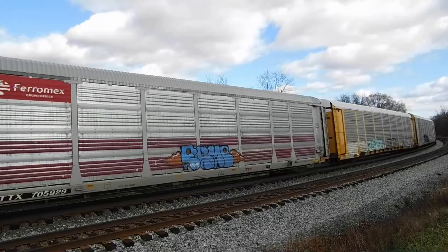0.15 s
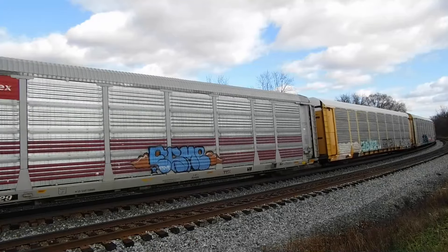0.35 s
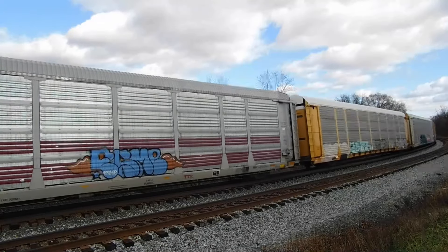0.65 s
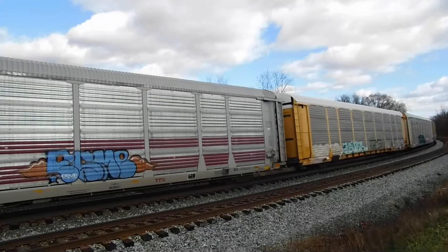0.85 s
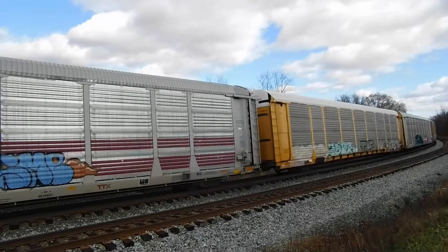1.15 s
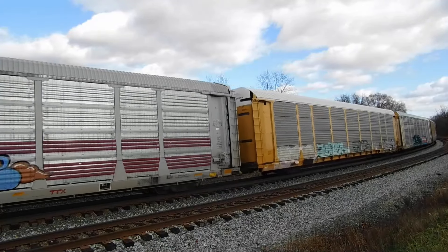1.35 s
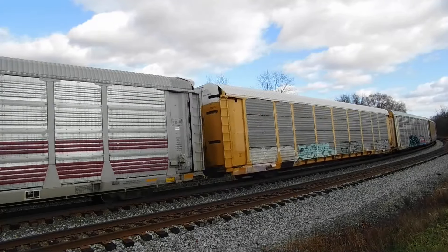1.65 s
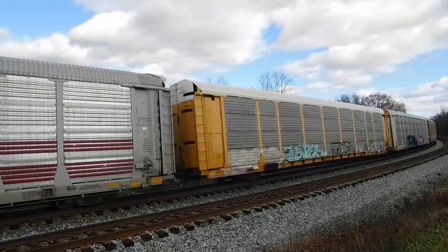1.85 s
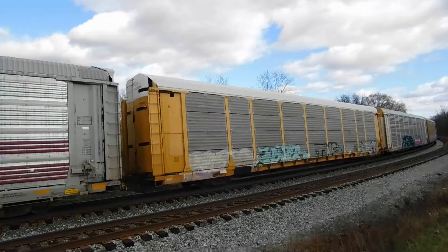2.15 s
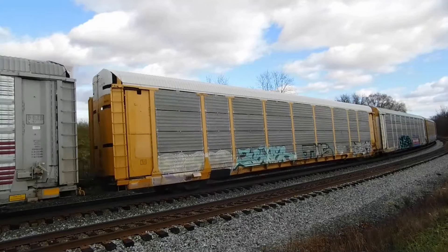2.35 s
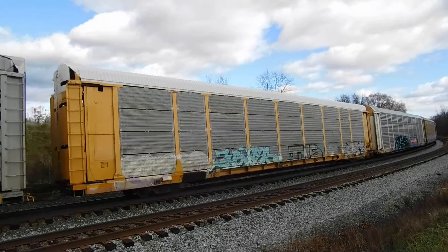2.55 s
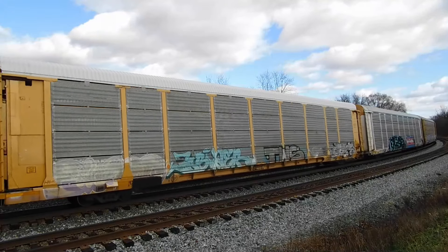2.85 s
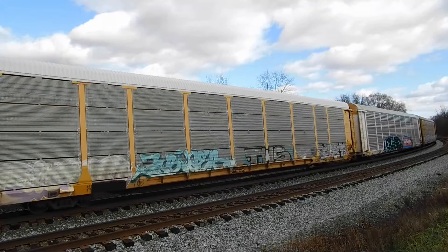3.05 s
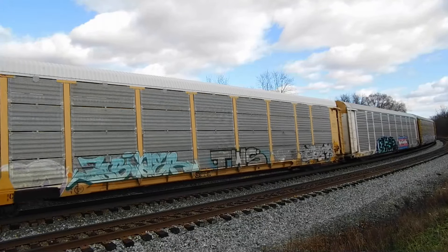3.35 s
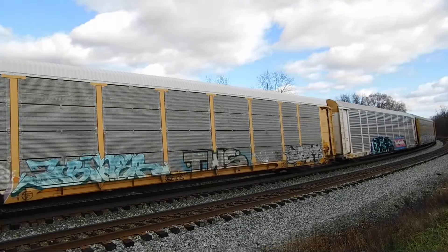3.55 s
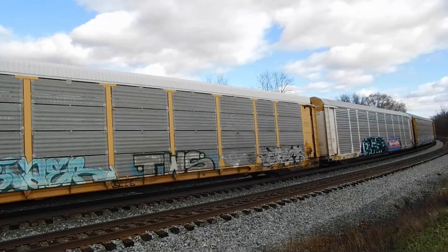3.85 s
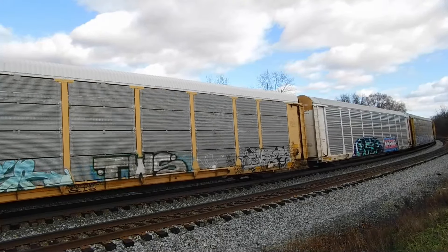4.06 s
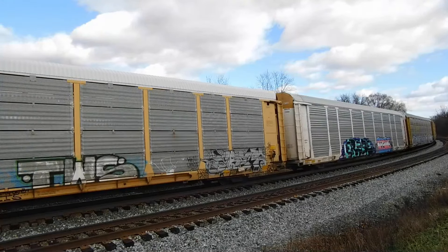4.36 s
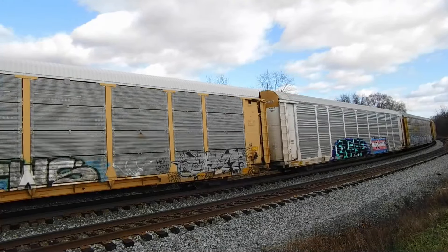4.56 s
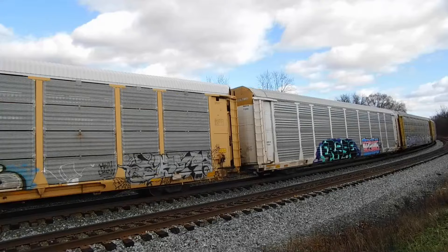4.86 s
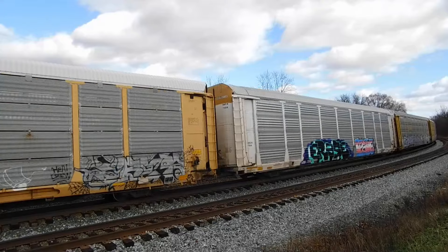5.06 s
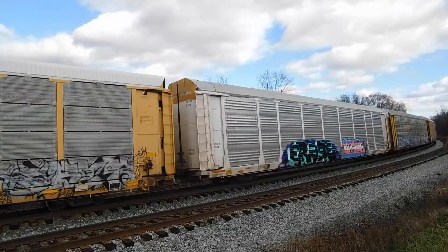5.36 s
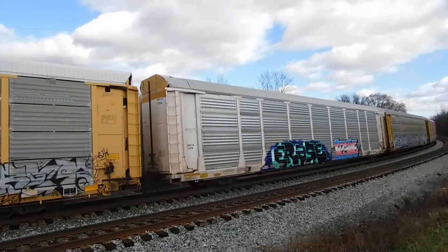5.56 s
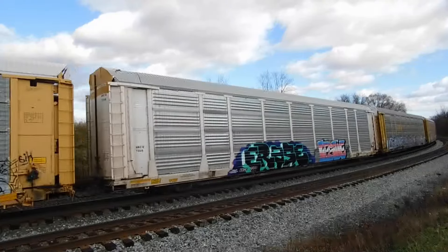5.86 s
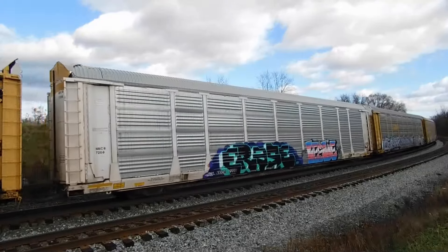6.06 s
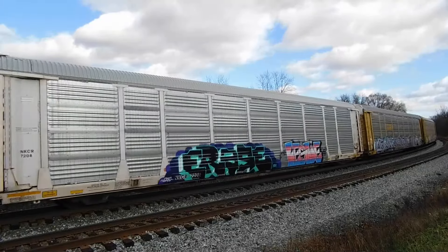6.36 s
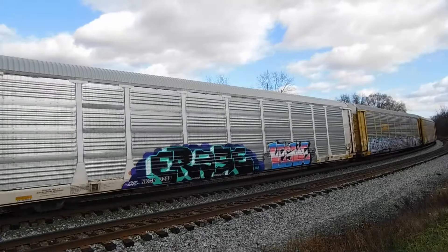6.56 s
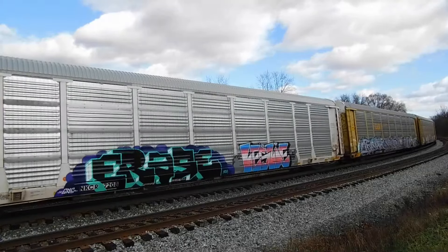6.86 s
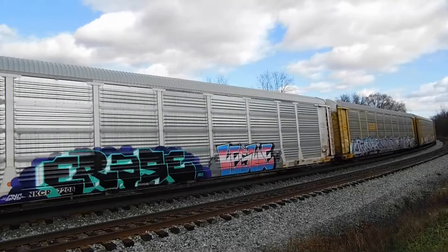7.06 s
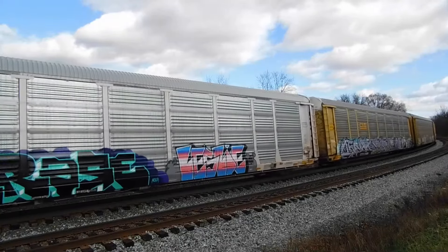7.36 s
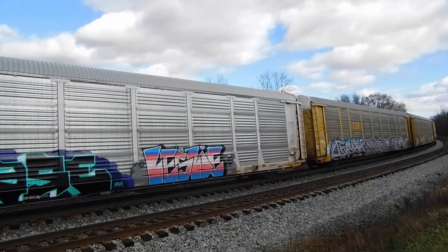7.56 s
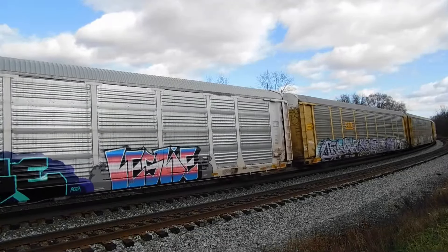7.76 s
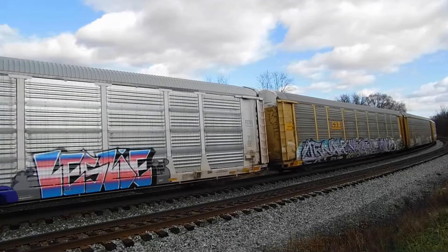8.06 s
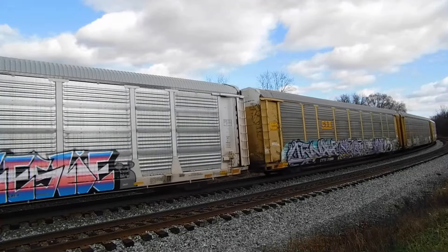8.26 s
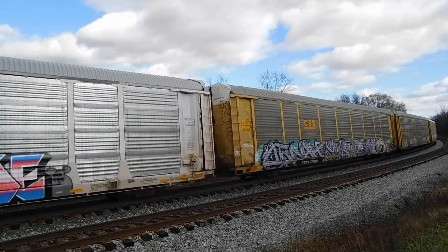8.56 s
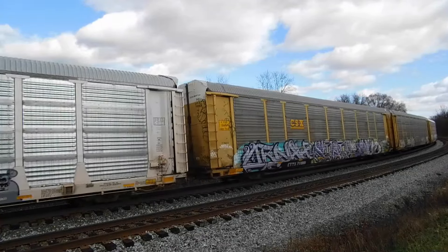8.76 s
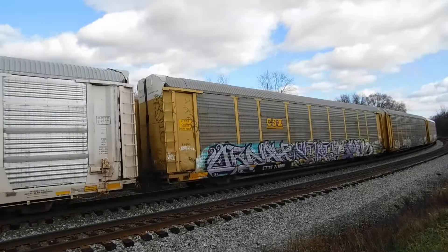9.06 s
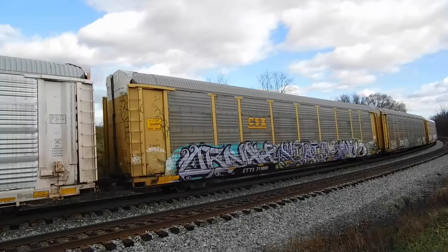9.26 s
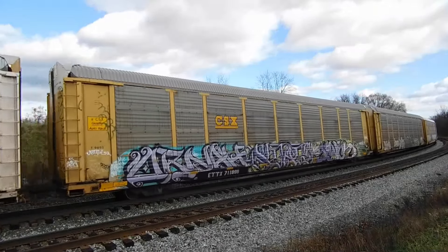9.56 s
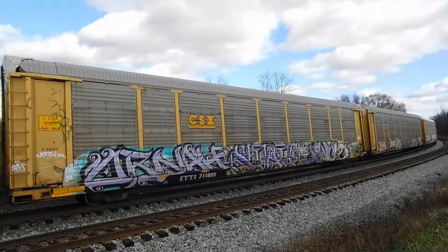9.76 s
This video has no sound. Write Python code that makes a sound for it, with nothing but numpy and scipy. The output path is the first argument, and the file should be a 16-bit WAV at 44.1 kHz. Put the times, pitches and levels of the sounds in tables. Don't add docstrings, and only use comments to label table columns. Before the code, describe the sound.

A freight train rolls close by outdoors, one wheel screaming a piercing, overloaded metallic squeal that drops slightly in pitch and fades as it recedes.

```python
import sys
import numpy as np
from scipy import signal
from scipy.io import wavfile
from scipy.ndimage import uniform_filter1d

SR = 44100
rng = np.random.default_rng(int(sys.argv[2]) if len(sys.argv) > 2 else 0)


def undo_db(level):
    steps = np.asarray(level, float) / 20
    return 10 ** steps


def log_audio(samples):
    frames = np.atleast_2d(samples).T
    limited = np.clip(frames, -1, 1)
    pcm = np.round(limited * 32767).astype(np.int16)
    wavfile.write(sys.argv[1], SR, pcm)


N = 437022


def rms_one(x):
    return x / np.sqrt(np.mean(x ** 2) + 1e-20)


def in_time(rows):
    s, *columns = np.transpose(rows)
    return [np.interp(np.arange(N) / SR, s, c) for c in columns]


def at_hz(points, hz):
    table_hz, values = np.transpose(points)
    return np.interp(np.log(hz), np.log(table_hz), values)


def drift(rate_hz):
    r = np.exp(-80 * np.pi * rate_hz / SR)
    sparse = rng.standard_normal(N // 40 + 2002)
    slow = signal.lfilter([1], [1, -2 * r, r * r], sparse)[2000:]
    return np.interp(np.arange(N) / 40, np.arange(len(slow)), rms_one(slow))


def bandpass(x, order, low_hz, high_hz):
    return signal.sosfilt(signal.butter(order, [low_hz, high_hz], "band", fs=SR, output="sos"), x)


def resonance(x, hz, width_hz):
    r = np.exp(-np.pi * width_hz / SR)
    poles = [1, -2 * r * np.cos(2 * np.pi * hz / SR), r * r]
    return signal.lfilter([(1 - r * r) / 2, 0, (r * r - 1) / 2], poles, x)


def pair(mid, side, alike):
    alike = np.clip(alike, -1, 1)
    return (np.sqrt(1 + alike) * mid + np.sqrt(1 - alike) * side * [[1], [-1]]) / np.sqrt(2)


def late_right(x, lag_us):
    i = np.arange(N)
    return np.array([x[0], np.interp(i - lag_us * SR / 10 ** 6, i, x[1])])


def spells(rows, rest_db, edge_s):
    gain = np.full((2, N), undo_db(rest_db))
    for s, length_s, db, *right_db in rows:
        start, stop = int(max(s, 0) * SR), int((s + length_s) * SR)
        gain[:, start:stop] = undo_db(db + np.array([[0], [sum(right_db)]]))
    return uniform_filter1d(gain, size=int(edge_s * SR), axis=1, mode="nearest")


# (start [s], length [s], level [dB])
LOW_LUMPS = [(.04, 0.092, -38), (.58, 0.1, -36), (.9, 0.13, -37.5), (1.4, 0.3, -37.5), (1.92, 0.12, -34),
             (2.15, 0.2, -33.5), (2.62, .22, -41), (3.04, 0.15, -31.5), (3.24, 0.27, -28), (3.62, .22, -32),
             (4.45, 0.17, -36), (5.4, 0.47, -47)]


def low_lumps():
    mid, side = [drift(7.1) + .5 * drift(46) + 0.42 * drift(235) for _ in range(2)]
    gain = spells(LOW_LUMPS, rest_db=-65, edge_s=.08)
    flutter_db = 9.5 + 2.5 * np.array([drift(1.2), drift(15)])
    return gain * undo_db(flutter_db) * pair(mid, side, 0.093)


# (time [s], level [dB])
ROLL = [(0, -29.5), (.7, -29.5), (1.35, -31.5), (2.2, -30), (2.95, -27.5), (4.0, -28), (5.4, -29.5),
        (6.0, -31), (6.9, -28.5), (8.2, -28), (8.6, -24.5), (9.3, -26), (9.91, -23.5)]
# (frequency [Hz], density [dB per Hz])
ROLL_COLOUR = [(24, -10), (70, -3.5), (189, -7.5), (500, 4), (1500, 1), (3000, -6), (8980, -26.5),
               (16000, -34)]
# (frequency [Hz], likeness [-1..1])
ROLL_ALIKE = [(60, 1), (300, 1), (1000, 0.9), (3000, 0.75), (9000, 0.033)]


def rolling():
    roll_db, = in_time(ROLL)
    together = drift(5)
    edges_hz = 24 * 2 ** np.arange(0, 9.6, .5)
    white = rng.standard_normal((2, 2, N))
    out = 0
    for k, (low_hz, high_hz) in enumerate(zip(edges_hz, edges_hz[1:])):
        mid, side = bandpass(white[k % 2], 2, low_hz, high_hz)
        hz = np.sqrt(low_hz * high_hz)
        gain = undo_db(at_hz(ROLL_COLOUR, hz) + .7 * together + .9 * drift(11))
        out = out + gain * pair(mid, side, at_hz(ROLL_ALIKE, hz))
    return undo_db(roll_db + 3) * late_right(rms_one(out), 113.3)


# (time [s], peak level [dB], t60 [s])
CLANKS = [
    (5.396, -26.5, 0.66),
    (5.435, -18, 0.24),
    (8.867, -25, 0.034),
    (9.391, -23, 0.3),
]
# (frequency [Hz], width [Hz], level [dB])
CLANK_MODES = [(680, 160, 0), (1250, 300, -3), (1580, 150, -3), (3600, 1500, -14)]


def couplers():
    burst, t = np.zeros(N), np.arange(N) / SR
    for s, peak_db, t60_s in CLANKS:
        age_s = np.clip(t - s, 0, None)
        burst += undo_db(peak_db + 2.5 - 60 * age_s / t60_s) * (1 - np.exp(-age_s / 0.0033))
    burst *= rng.standard_normal(N)
    clank = 0
    for hz, width_hz, db in CLANK_MODES:
        clank = clank + undo_db(db) * np.sqrt(3000 / width_hz) * resonance(burst, hz, width_hz)
    return late_right([clank, clank], 107)


SPEED_M_S, DISTANCE_M, NEAREST_S = 8.07, 11.4, 3.25


def doppler(nearest_s=NEAREST_S):
    along_m = SPEED_M_S * (np.arange(N) / SR - nearest_s)
    return 1 - SPEED_M_S / 343 * along_m / np.hypot(along_m, DISTANCE_M)


def wheel_mode(hz, width_hz, gain, lead_us):
    shift = np.where(np.arange(N) < 6.3 * SR, doppler(), doppler(11.5))
    phase = 2 * np.pi * np.cumsum(hz * shift) / SR
    ring = drift(width_hz) * np.sin(phase) + drift(width_hz) * np.cos(phase)
    return gain * late_right([ring, ring], lead_us)


QUIET_DB, SPELL_EDGE_S = -55, 0.15
# (start [s], length [s], level [dB])
HUMS = [(.2, 0.38, -32.5), (1.5, 0.68, -35), (2.6, 0.31, -34), (3.58, 0.23, -23.5), (3.85, 0.15, -21),
        (4.25, 0.38, -30), (4.6, 0.4, -29.5), (5.46, 0.25, -29.5), (6.5, 1.0, -32.5), (8.8, 0.21, -32),
        (9.0, .95, -35)]


def hum(lead_us):
    return undo_db(-4) * wheel_mode(600, 12, spells(HUMS, QUIET_DB, SPELL_EDGE_S), lead_us)


# (start [s], length [s], level [dB])
WHINES = [(0, .34, -45.5), (.36, 0.16, -35), (.63, 0.061, -31.5), (.85, .25, -47), (1.36, 0.18, -42),
          (2.62, .22, -48), (3.7, .14, -45), (4.12, 0.062, -31), (4.32, 0.12, -36.5), (4.5, 0.37, -43),
          (5.0, 0.21, -41), (5.42, 0.26, -42.5), (6.5, 1.0, -51), (9.42, 0.28, -40.5)]


def whine(lead_us):
    return undo_db(10) * wheel_mode(1452, 12, spells(WHINES, QUIET_DB, SPELL_EDGE_S), lead_us)


# (time [s], level [dB], right minus left [dB])
ECHOES = [(0, -14.5, 7), (.5, -10.5, 2), (1.2, -7.5, -2.5), (1.6, -8.5, -6.5), (2.2, -5, -5),
          (2.75, -5.5, -10.5), (3.2, -1.5, -5), (3.9, -7, -10), (4.5, -7.5, -7), (5.3, -12.5, -15),
          (6.0, -12, -9), (6.6, -13.5, -8.5), (6.79, -17, -6), (7.4, -20.5, -5), (8.0, -22, -6),
          (9.0, -25, -17.5), (9.55, -24.5, -2), (9.91, -45, -6)]
# (low [Hz], high [Hz])
ECHO_BANDS = [(2430, 2544), (2325, 2650)]
ECHO_DB = [5.5, -25.5]


def car_echoes(echo_db, right_db, lead_us):
    echoes = 0
    for (low_hz, high_hz), level_db in zip(ECHO_BANDS, ECHO_DB):
        mid, side = bandpass(rng.standard_normal((2, N)), 3, low_hz, high_hz)
        echoes = echoes + undo_db(level_db) * rms_one(pair(mid, side, 0.87))
    gain = undo_db(echo_db + 0.38 * right_db * [[-1], [1]])
    return gain * late_right(rms_one(echoes), 1.073 * lead_us)


# (start [s], length [s], left tone level [dB], right minus left [dB])
BITES = [(0, 0.21, -9, -0.5), (.3, 0.28, -18.5, 6), (.52, 0.47, -2.5, 3), (1.0, 0.54, 3, 4.5),
         (1.6, 0.15, -7, 1), (1.8, 0.068, -5.5, -6), (2.0, .32, 3, -3.5), (2.33, 0.27, 15.5, 0.5),
         (2.795, 0.32, 1.5, 1), (3.122, 0.19, 2, -0.5), (3.378, 0.19, -0.5, -4), (3.64, 0.098, -4, -8),
         (3.78, 0.437, 1.5, -3.5), (4.23, 0.22, -4, -16), (4.46, 0.14, -1, -1), (4.72, .26, -2.5, -5),
         (5.0, 0.4, 2.5, -10), (5.43, .2, -2, -7), (5.64, 0.224, -5.5, -2), (5.9, 0.45, -2, -7),
         (6.42, 0.327, -13, -17), (6.88, 0.18, -16.5, -1.5), (7.36, 0.45, -12, -5), (7.82, 0.59, -15.5, -4),
         (8.56, 0.17, -20, -11), (9.05, 0.098, -18.5, 3), (9.27, 0.33, -21, -3)]
OVERTONE_DB = [-30, -41.5, -48.5, -51, -47]
FACING_DB = [
    [2.5],
    [7],
]


def squeal(lead_us):
    echo_db, right_db = in_time(ECHOES)
    pitch_hz = 2486 * doppler()
    phase = 2 * np.pi * np.cumsum(pitch_hz) / SR + 0.158 * drift(7.1)
    phase = phase - 2 * np.pi * pitch_hz * lead_us / 10 ** 6 * [[0], [1]]

    bites = spells(BITES, rest_db=-37, edge_s=0.028)
    floor = undo_db(echo_db - 2)
    waver_db = 2.4 * np.array([drift(14), drift(21.4)])
    gain = np.sqrt(2) * np.maximum(bites, floor) * undo_db(waver_db)

    echo_db = echo_db + 1.8 * drift(6.5)
    echoes = car_echoes(echo_db, right_db, lead_us)
    near = undo_db(echo_db - 6.0) * (drift(35.4) * np.sin(phase) + drift(34.4) * np.cos(phase))

    blur = .5 * drift(48) + 0.56 * drift(3.1)
    partials = 0
    for number, db in enumerate(OVERTONE_DB, 2):
        partials = partials + undo_db(db + 4.0 * drift(17)) * np.sin(number * (phase + blur))
    facing = (doppler() - 1) * 343 / SPEED_M_S
    echo_gain = undo_db(echo_db + 6.5 + 0.17 * right_db * [[-1], [1]])
    partials = partials * undo_db(facing * np.array(FACING_DB)) * (gain + echo_gain)
    return gain * np.sin(phase) + partials + near + echoes


# (time [s], lead of left port [us])
LEAD = [(0, -104), (1.2, -72), (1.8, -53), (2.4, 6.5), (3, 80), (3.6, 137.5), (4.2, 182.5), (5.4, 156.5),
        (6.6, 161), (7.6, 113), (8.5, 134), (9.91, 130)]


def scene():
    lead_us, = in_time(LEAD)
    under = rolling() + couplers() + hum(lead_us) + whine(lead_us)
    under = under * undo_db([[.6], [-.6]])
    return low_lumps() * undo_db([[.8], [-.8]]) + under + squeal(lead_us)


TOP = 0.59


def overload_noise(dry):
    clipped_share = uniform_filter1d(1. * (np.abs(dry) > TOP), size=60, axis=1)
    hiss, rumble = rng.standard_normal((2, 2, N))
    low = rms_one(signal.sosfilt(signal.butter(1, 220, fs=SR, output="sos"), rumble))
    crackle = undo_db(-29) * (1 - clipped_share) ** .5 * low
    return undo_db(-59) * hiss + clipped_share ** .5 * (undo_db(-27.0) * hiss + crackle)


def roll_off(x):
    return signal.sosfilt(signal.butter(12, 17100, fs=SR, output="sos"), x)


def record(dry):
    bypass = .6 * signal.sosfilt(signal.butter(2, 200, fs=SR, output="sos"), dry)
    fine = signal.resample_poly(dry - bypass, 160, 147, axis=1)
    x = signal.resample_poly(np.clip(fine, -TOP, TOP), 147, 160, axis=1)[:, :N]
    x = x + .05 * x ** 2 + bypass + overload_noise(dry)
    pole_hz, zero_hz = 2600, 4200
    shelf = signal.bilinear([1 / zero_hz / 2 / np.pi, 1], [1 / pole_hz / 2 / np.pi, 1], SR)
    x = undo_db(-1.5) * signal.lfilter(*shelf, x)
    x = signal.sosfilt(signal.butter(1, 14, "high", fs=SR, output="sos"), x)
    x = signal.sosfilt(signal.cheby2(14, 60, 16400, fs=SR, output="sos"), x)
    return roll_off(x)


dry = scene()
out = record(dry)
log_audio(out)
```